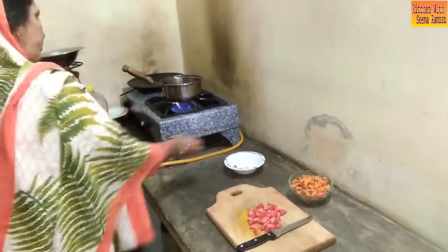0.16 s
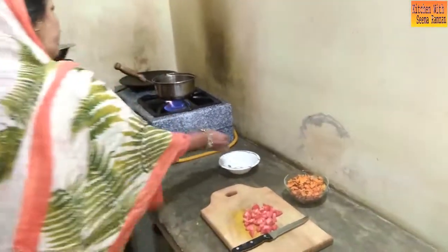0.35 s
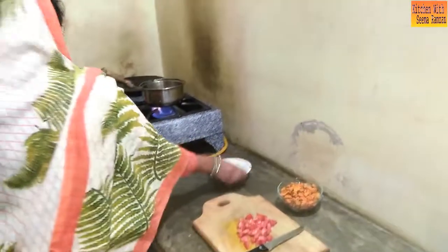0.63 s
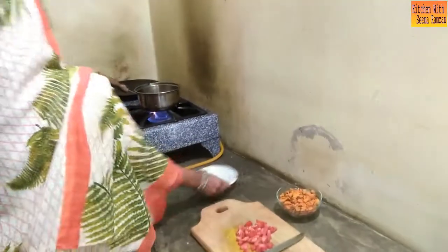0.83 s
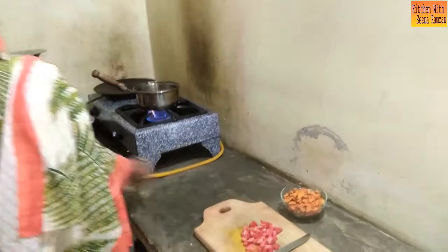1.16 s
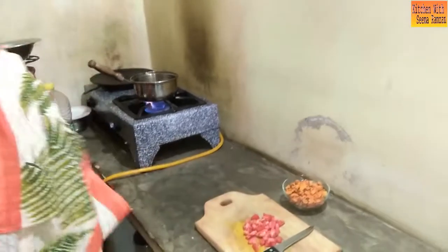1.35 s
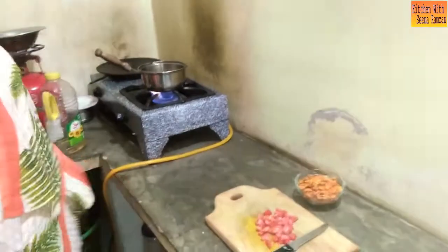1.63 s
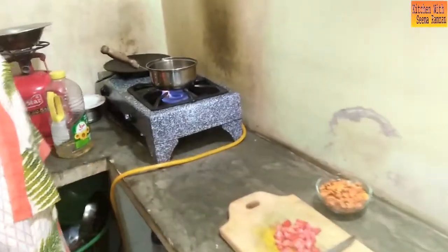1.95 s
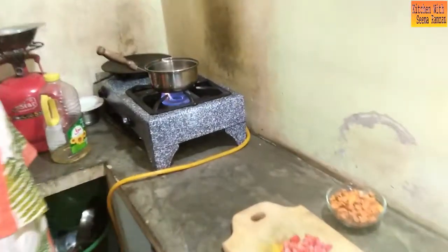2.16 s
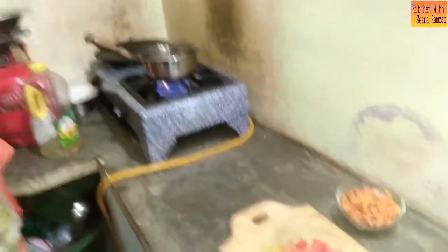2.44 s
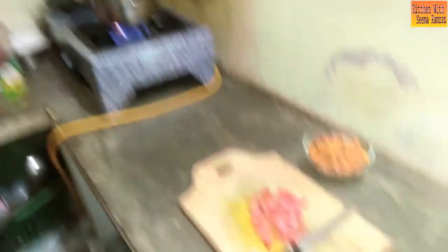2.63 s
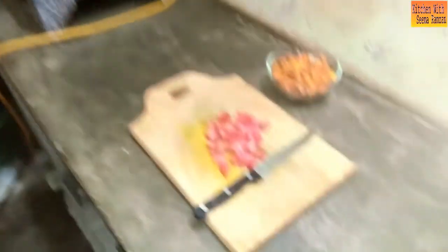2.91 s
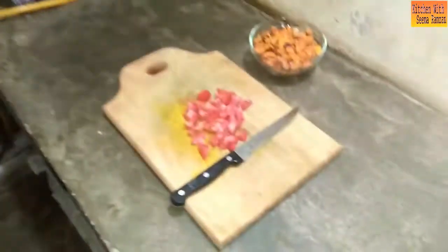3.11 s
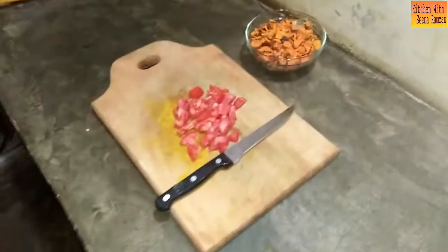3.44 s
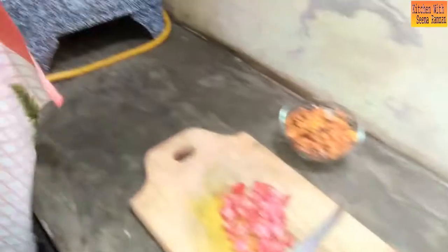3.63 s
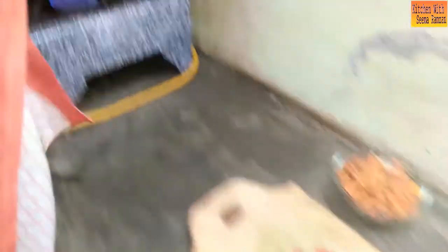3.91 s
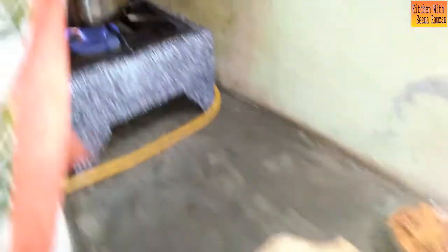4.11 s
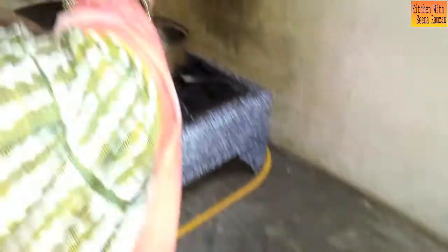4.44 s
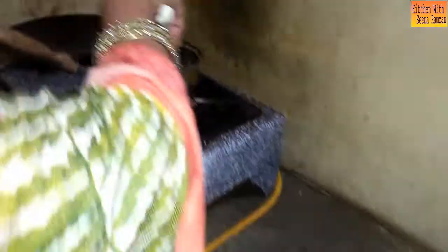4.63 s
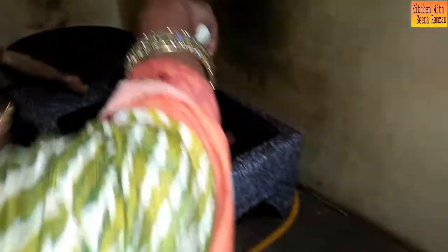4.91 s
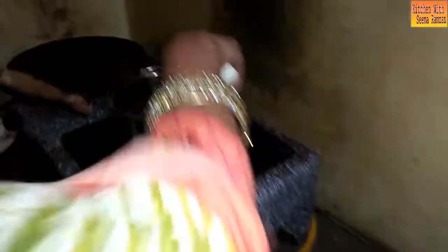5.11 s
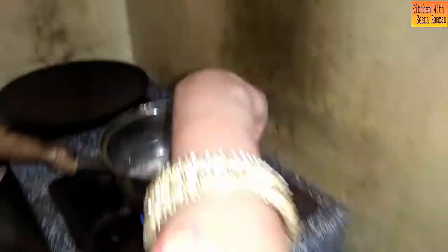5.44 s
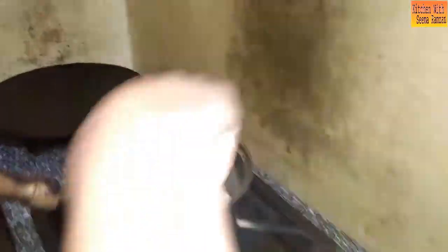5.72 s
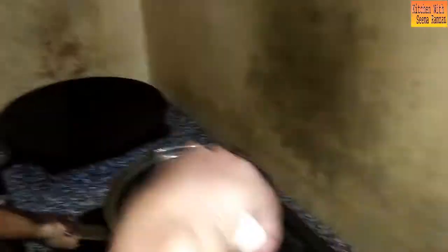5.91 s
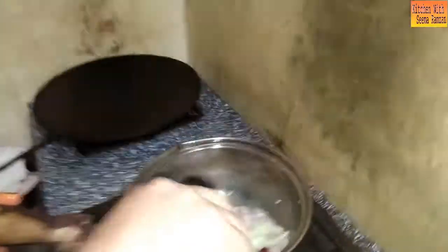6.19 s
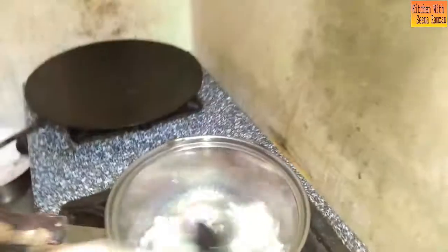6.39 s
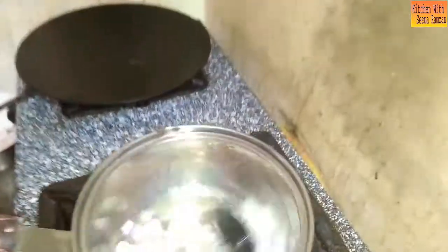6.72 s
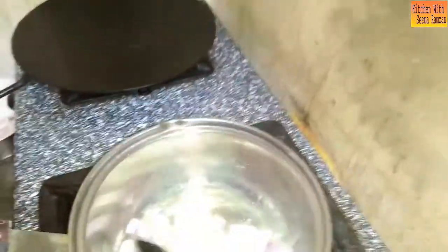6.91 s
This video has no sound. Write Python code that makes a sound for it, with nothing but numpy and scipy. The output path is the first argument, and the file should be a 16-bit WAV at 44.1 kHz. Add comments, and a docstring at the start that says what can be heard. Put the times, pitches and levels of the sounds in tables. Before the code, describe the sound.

A soft, blurred sizzle far off, with hollow bowl knocks and short rubs over stone in a reverberant little kitchen. Then the handheld microphone steps close to the pan: fierce, treble-heavy frying flares up, oil ticks and pops spread left and right, a spoon scrapes through onions and hits steel, and the pan faintly rings above a low rumble.

```python
"""In a small hard-walled kitchen, onions fry in a steel pan on a gas stove: crowds of tiny noise bursts.
At first the pan is far off, and a bowl knocks and slides on the stone counter: rings and slipping noise.
Then the microphone comes close: the sizzle grows loud and bright, and oil spits as sharp coloured ticks.
A spoon stirs and raps the metal; under it lie a pan ring, a low rumble and a faint hum."""
import sys
import numpy as np
from scipy import signal
from scipy.fft import rfft, irfft
from scipy.io import wavfile
from scipy.ndimage import uniform_filter1d

SR = 44100
rng = np.random.default_rng(int(sys.argv[2]) if len(sys.argv) > 2 else 0)


def transcribe(signal):
    """Save signal, clipped to [-1, 1], as a 16-bit WAV file at the path in sys.argv[1]."""
    frames = np.atleast_2d(signal).T
    limited = np.clip(frames, -1, 1)
    pcm = np.round(limited * 32767).astype(np.int16)
    wavfile.write(sys.argv[1], SR, pcm)


N = 311346  # samples, about 7 s
TIME = np.arange(N) / SR
BINS = np.fft.rfftfreq(4096, 1 / SR)  # the pitches in Hz at which spectra are drawn


# Tone of the sizzle and of its finest fizz. Columns: pitch_hz, level_db [dB per Hz, relative]
SIZZLE_TONE = [(900, -27), (2000, -18.5), (3300, -18.5), (4800, -13.5), (5700, -9.5), (7000, -2), (8300, 0),
               (9500, -6), (11000, -26.5), (14300, -36)]
FIZZ_TONE = [(3000, -33), (6000, -14), (9500, -4), (11000, -7.5), (12500, -4), (14000, 0.5), (15000, -16)]
# Loudness of the steady sizzle over time. Columns: time_s, level_db
SIZZLE_LEVEL = [(0, -60), (3.5, -61.5), (3.85, -50.5), (4.45, -42), (5.0, -55), (5.6, -50), (6.0, -43),
                (7.05, -36)]
CRACKLE_DB, POP_DB = 0, 3  # against the sizzle, at nearness 1


def frying(fizz_rise_db=13):
    """Water boils out of the onions and drops crackle; far off, the room blurs the grain into a wash."""
    near = nearness(TIME)
    wash = 1.2 - .7 * near
    sizzle = colour(bubbles(per_s=2000, spread_db=-2.5, wash=wash), read(SIZZLE_TONE, BINS))
    fizz = colour(bubbles(per_s=1100, spread_db=1.5, wash=wash), read(FIZZ_TONE, BINS))
    fizz_gain = gain_of(fizz_rise_db * near - 6)  # the finest fizz carries only from close by
    snaps = near * (gain_of(CRACKLE_DB) * crackles() + gain_of(POP_DB) * pops())
    loudness = np.sqrt(level(SIZZLE_LEVEL) ** 2 + flares())
    return loudness * (sizzle + fizz_gain * fizz + snaps)


# Wet pieces meet the oil and the sizzle flares. Columns: start_s, level_db
FLARES = [(-0.03, -51.5), (0.22, -60), (0.67, -51.5), (0.8, -55.5), (1.08, -52), (1.3, -57), (1.56, -50),
          (1.71, -56), (1.96, -76), (2.49, -56.5), (3.26, -59.5), (3.67, -51), (4.35, -41), (4.73, -43),
          (5.08, -51), (5.87, -38), (6.28, -44), (6.63, -33.5), (6.87, -49)]
FLARE_RISE_S, FLARE_FALL_DB_PER_S = 0.021, 54


def flares():
    """Power of the flares: a quick rise and a steady fall in dB."""
    power = 0
    for start_s, db in FLARES:
        rise = np.clip((TIME - start_s) / FLARE_RISE_S, 0, 1)
        fall_db = FLARE_FALL_DB_PER_S * np.maximum(TIME - start_s - FLARE_RISE_S, 0)
        power = power + (rise * gain_of(db - fall_db)) ** 2
    return power


def bubbles(per_s, spread_db, wash):
    """Tiny bursts of very unequal size, in clumps, over the wash of countless smaller ones."""
    size = gain_of(spread_db * np.minimum(rng.exponential(1, N), 5))
    size *= rng.random(N) < per_s / SR
    bursts = evened(size * rng.standard_normal((2, N)))
    blend = (bursts + wash * rng.standard_normal((2, N))) / np.sqrt(1 + wash ** 2)
    clumps_db = 1.0 * drift(.006) + 1.1 * drift(.03)
    return blend * gain_of(clumps_db)


# Tone of bursting drops, shared by crackles, pops and ticks. Columns: pitch_hz, level_db [relative]
SPIT_TONE = [(100, -42), (700, -17), (1600, -11), (3000, -12.5), (5000, -7.5), (6500, -4), (8300, 1),
             (10500, -6), (12500, -4), (14200, 6)]


def crackles(decay_cycles=11, spread_db=6.0, per_s=330):
    """Larger bubbles snap one by one, each a brief fading tone at one of 48 pitches."""
    count = 48
    size = gain_of(spread_db * np.minimum(rng.exponential(1, N), 4.2))
    size *= rng.random(N) < per_s / SR
    kind, t = rng.integers(0, count, N), TIME[:400]
    out = np.zeros((2, N))
    for k, hz in enumerate(np.geomspace(5600, 14000, count)):
        shape = (1 - np.exp(-hz * t / 3)) * np.exp(-hz * t / decay_cycles)
        tone = np.sin(2 * np.pi * (hz * t + rng.random((2, 1))))
        snap = gain_of(read(SPIT_TONE, hz)) * shape * tone
        for at in np.flatnonzero((kind == k) & (size > 0)):
            add(out, at / SR, size[at] * snap)
    return evened(out)


def pops(per_s=55):
    """Now and then a small drop cracks sharply above the sizzle, as a very short noise burst."""
    out, t = np.zeros((2, N)), TIME[:200]
    for at in np.flatnonzero(rng.random(N) < per_s / SR):
        size_db = 4 * min(rng.exponential(), 2.2)
        add(out, at / SR, gain_of(size_db) * np.exp(-t / .0005) * rng.standard_normal((2, len(t))))
    return colour(out, read(SPIT_TONE, BINS))


# Single sharp ticks of spitting oil, some thin and bright, some fuller.
# Columns: start_s, level_db, body_db [below 5 kHz against the treble]
SPITS = [(1.3052, -29, -17), (3.1401, -36, -16), (4.0664, -23, -0.5), (4.082, -43, -1), (4.2309, -22, -2),
         (4.4617, -21, -2), (4.7208, -12.5, -8), (5.0208, -26, 3.5), (5.3633, -15, -8),
         (5.4891, -19.5, 2.5), (5.6435, -17.5, -20), (5.809, -14.5, -38), (6.0338, -3.5, -4.5),
         (6.0755, -6.5, -4), (6.142, -7.5, -4.5), (6.212, -19, -9), (6.4231, -8.5, -9), (6.477, -15, -10),
         (6.489, -10.5, -1.5), (6.565, -13.5, -1), (6.5993, -12.5, -2), (6.9627, -12, -6), (6.995, -7, -12),
         (7.0217, -15, 11)]
SPIT_ROOM_FAR_DB, SPIT_ROOM_CLOSE_DB = 10.5, -0.5  # room against the direct crack


def spits():
    """Drops burst in the hot oil; the closer the pan, the less room is heard."""
    out = np.zeros((2, N))
    for start_s, db, body_db in SPITS:
        room_db = SPIT_ROOM_FAR_DB + (SPIT_ROOM_CLOSE_DB - SPIT_ROOM_FAR_DB) * approach(start_s)
        add(out, start_s, tick(start_s, db, body_db, room_db))
    return out


# The spoon clinks on the pan. Columns: start_s, level_db, body_db [below 5 kHz against the treble]
CLINKS = [(1.5208, -34.5, 1.5), (1.898, -33.5, -5.5), (3.5318, -22.5, 4), (4.2787, -15, 8),
          (4.6168, -13.5, 0.5), (5.1925, -3, -4.5), (5.3467, -11.5, -0.5), (5.6622, -8, -7.5),
          (6.1511, -3, -2), (6.2238, -10.5, 4.5), (6.6406, -9.5, 13), (6.7512, -9, 0), (6.897, -12, 7.5),
          (6.913, -9.5, 5.5)]
CLINK_ROOM_DB = 5


def clinks():
    """The spoon touches the steel and the room answers."""
    out = np.zeros((2, N))
    for start_s, db, body_db in CLINKS:
        add(out, start_s, tick(start_s, db, body_db, CLINK_ROOM_DB))
    return out


def tick(s, db, body_db, room_db, far_dull_db=9):
    """A sharp tick rings for a few milliseconds, each with its own colour, duller from afar."""
    low = np.interp(BINS, [4500, 7000], [1, 0])
    top = np.interp(BINS, [9500, 12000], [0, 1])
    dull_db = far_dull_db * (.8 - nearness(s))
    tint_db = 2.8 * evened(uniform_filter1d(rng.standard_normal(len(BINS)), size=110))
    spectrum_db = read(SPIT_TONE, BINS) + body_db * low - dull_db * top + tint_db
    return gain_of(db + 12.5) * strike(spectrum_db, room_db, rattle_db=-16, rattle_t60=.02)


# Close spoon raps, each after a dull push. Columns: start_s, rap_peak_db, push_peak_db
RAPS = [(6.1538, -11.5, -23.5), (6.2247, -13, -20), (6.642, -8.5, -14.5), (6.709, -8, -22.5),
        (6.9294, -8.5, -15)]
# Tone of the rap and of the push. Columns: pitch_hz, level_db [relative]
RAP_TONE = [(30, -21), (200, -1), (600, 6.5), (1300, 13.5), (2000, 10), (3000, -7), (6000, -22),
            (14000, -53)]
PUSH_TONE = [(15, -49), (50, 14), (200, 6), (450, 1.5), (900, -1.5), (2000, -23), (6000, -47)]


def raps(lead_s=0.00737):
    """The spoon pushes through the onions, then meets the metal: a dull click, then a harder one."""
    out = np.zeros((2, N))
    rap, push = click(read(RAP_TONE, BINS)), click(read(PUSH_TONE, BINS))
    for start_s, rap_db, push_db in RAPS:
        add(out, start_s - lead_s, gain_of(push_db) * push / abs(push).max())
        add(out, start_s, gain_of(rap_db) * rap / abs(rap).max())
    return out + gain_of(-27) * kitchen(out)


# Tone of the tumbling food and of the low rumble. Columns: pitch_hz, level_db [dB per Hz, relative]
CHURN_TONE = [(100, -6.5), (230, -14), (400, -14.5), (620, -3), (850, 2), (1150, 4.5), (1550, 6),
              (1900, 1.5), (2300, 1.5), (3000, 0), (5000, -10.5), (9000, -0.5)]
RUMBLE_TONE = [(15, 5), (35, -39), (55, -2), (75, 8), (100, 1.5), (160, -13), (280, -6), (500, -14.5),
               (1500, -26)]
# Strokes that push the food around. Columns: start_s, length_s, level_db
STROKES = [(-0.12, 0.3, -54), (0.95, .4, -59), (1.52, 0.45, -61.5), (3.05, 0.46, -57.5), (3.6, 0.84, -48),
           (4.25, 0.69, -45), (5.5, 0.71, -44.5), (6.08, 0.45, -39), (6.86, .18, -33.5)]
# Soft low bumps of someone moving about. Columns: start_s, length_s, level_db
BUMPS = [(0.08, 0.34, -65.5), (1.07, 0.27, -60), (1.92, .2, -56.5), (3.27, 0.28, -62.5),
         (3.68, 0.24, -54.5), (4.22, 0.44, -64), (4.6, 0.17, -51.5), (5.76, 0.32, -50), (6.1, 0.55, -44.5),
         (6.9, 0.17, -38)]
SIMMER_FAR_DB, SIMMER_CLOSE_DB = -64, -51.5  # the pan's own churn between strokes
FLAME_DB = -77.5  # the burner's steady rumble


def stirring(ring_db=9, ring_width_hz=14):
    """Pieces tumble in the pan and its ringing pitches colour them faintly, above a low rumble."""
    modes = sum(gain_of(db / 2) / (1 + ((BINS - hz) / ring_width_hz) ** 2) for hz, db, _ in PAN)
    spectrum_db = read(CHURN_TONE, BINS) + 10 * np.log10(1 + 2 * gain_of(ring_db) ** 2 * modes)
    churn = colour(bubbles(per_s=300, spread_db=-1.0, wash=1.0), spectrum_db)
    rumble = colour(rng.standard_normal((2, N)), read(RUMBLE_TONE, BINS))
    simmer = gain_of(SIMMER_FAR_DB + (SIMMER_CLOSE_DB - SIMMER_FAR_DB) * approach(TIME))
    churn_gain = np.sqrt(simmer ** 2 + swells(STROKES))
    rumble_gain = np.sqrt(gain_of(FLAME_DB) ** 2 + swells(BUMPS))
    return churn_gain * churn + rumble_gain * rumble


# Knocks of bowl and spoon.
# Columns: start_s, level_db, pitch_hz, width_hz, room_db [room against the direct crack]
KNOCKS = [(0.558, -31.5, 1354, 220, 9.5), (.807, -34, 1544, 258, 6), (.819, -34, 1760, 240, 3.5),
          (1.103, -44, 1720, 795, 5.5), (1.901, -39.5, 1230, 700, -4.5), (3.149, -56, 500, 300, -2),
          (3.530, -41, 2410, 1040, 5), (4.28, -43, 1570, 1560, 19), (4.614, -37.5, 1660, 950, 10.5),
          (5.191, -50.5, 1800, 1180, 16), (5.346, -33, 1820, 1160, 1.5), (5.428, -34.5, 1340, 1450, -8),
          (5.685, -27, 1370, 420, -7), (5.785, -25.5, 1150, 525, -2)]
# What a knocked hollow rings with. Columns: multiple [of its pitch], level_db
OVERTONES = [(.42, -24.5), (1, 3), (1.55, -14.5), (1.95, -17.5), (3.4, -23)]


def knocks():
    """Short hollow blows, each a crack through broad resonances, chatter a little and fill the room."""
    out = np.zeros((2, N))
    for start_s, db, hz, width_hz, room_db in KNOCKS:
        rings = [mode_db + hollow(multiple * hz, width_hz) for multiple, mode_db in OVERTONES]
        blow = strike(np.max(rings, axis=0), room_db, rattle_db=-25.0, rattle_t60=0.1)
        add(out, start_s, gain_of(db + 18.5) * blow)
    return out


# Things dragged over stone and steel.
# Columns: start_s, length_s, level_db, pitch_hz [centre], width_hz, squeak_db [against the rub]
SLIDES = [(0.022, 0.04, -57.5, 1790, 1620, -15), (.775, 0.114, -53.5, 835, 470, 3.5),
          (1.972, 0.08, -49.5, 980, 990, 7), (2.175, 0.062, -49.5, 710, 840, -14),
          (2.778, 0.086, -53, 7450, 1400, -16), (2.87, .12, -68, 2470, 500, 7),
          (3.147, 0.064, -60.5, 3370, 1200, 9), (3.285, 0.063, -60.5, 3960, 2240, -8),
          (3.673, 0.055, -50.5, 4540, 3000, -10), (3.959, 0.094, -49, 870, 458, -18),
          (4.364, 0.045, -47.5, 898, 750, -25), (5.46, 0.094, -54.5, 560, 287, -25),
          (5.697, 0.046, -42, 1640, 280, -42), (5.777, 0.19, -50, 680, 690, -25)]
SQUEAK_HZ, SQUEAK_WIDTH_HZ = 2757, 110


def slides(slips_per_s=900):
    """Things dragged over stone and steel: quick slips through one broad resonance and a narrow squeak."""
    out = np.zeros((2, N))
    for start_s, length_s, db, hz, width_hz, squeak_db in SLIDES:
        count = int(length_s * SR)
        slips = rng.standard_normal((2, count)) * (0.27 + (rng.random(count) < slips_per_s / SR))
        spectrum_db = np.maximum(hollow(hz, width_hz), squeak_db + hollow(SQUEAK_HZ, SQUEAK_WIDTH_HZ))
        rub = evened(colour(slips, spectrum_db))
        add(out, start_s, gain_of(db) * rub * signal.windows.tukey(count, .25))
    return out + gain_of(-3) * kitchen(out)


# What the pan rings with. Columns: pitch_hz, level_db, t60_s [time to fall by 60 dB]
PAN = [(265, -11, .9), (299, -10, .5), (460, -22, .4), (600, -16, .4), (788, 0, .8), (904, -12, .7),
       (1470, -12, .4), (1582, -7, .35), (2175, -16, .3), (2370, -17, .3), (4055, -18, .2)]
# The pan is nudged. Columns: start_s, level_db
NUDGES = [(4.372, -38), (4.59, -50), (5.785, -41), (5.93, -51), (6.225, -50), (6.642, -50), (6.929, -57)]


def pan_ring():
    """The pan hums when nudged: fading tones, their pitch wavering as it rocks on its support."""
    out, t = np.zeros((2, N)), TIME[:SR]
    for start_s, db in NUDGES:
        rocked = t + np.cumsum(.008 * drift(.04)[:SR]) / SR
        ring = np.zeros(SR)
        for hz, mode_db, t60 in PAN:
            tone = np.sin(2 * np.pi * (hz * rocked + rng.random()))
            ring += gain_of(mode_db - 60 * t / t60) * tone
        add(out, start_s, gain_of(db) * ring * (1 - np.exp(-t / 0.0057)))
    return out


# A faint hum swells and fades. Columns: start_s, length_s, level_db
HUM = [(2.0, 1.1, -81), (3.58, 0.57, -63)]
HUM_HZ = 434


def hum(waver=0.0047, flutter_db=2.5):
    """A faint, thin tone whose pitch and level waver slightly."""
    turns = np.cumsum(HUM_HZ * (1 + waver * drift(.03))) / SR
    return np.sqrt(2 * swells(HUM)) * gain_of(flutter_db * drift(0.026)) * np.sin(2 * np.pi * turns)


# How long each pitch lingers in the kitchen. Columns: pitch_hz, t60_s [time to fall by 60 dB]
KITCHEN = [(60, 1), (300, 0.37), (1400, 0.57), (4000, 0.49), (8000, 0.43), (14000, 0.1)]


def kitchen(x):
    """Dense reflections from near walls, each band dying at its own speed."""
    count = 24000
    t = np.arange(count) / SR
    taps = rng.choice([-1., 1.], (2, count)) * (rng.random((2, count)) < .25)
    taps *= np.interp(t, [.002, .011, .018, .04], [0.71, 0.6, 1.15, 1.03])
    hz, at, z = signal.stft(taps, SR, nperseg=256)
    fade = gain_of(-60 * at / read(KITCHEN, hz)[:, None])
    tail = signal.istft(z * fade, SR, nperseg=256)[1]
    return signal.fftconvolve(x, tail / np.linalg.norm(tail[0]), axes=1)[:, :N]


def strike(spectrum_db, room_db, rattle_db, rattle_t60):
    """A crack with a brief rattle, then the room's answer, drawn afresh each time."""
    count = 24000
    crack = np.zeros((2, count))
    crack[0, 0] = 1
    crack[1, rng.integers(2, 20)] = .5  # the side part comes slightly later and weaker
    rattle = gain_of(rattle_db - 60 * TIME[:count] / rattle_t60) * rng.standard_normal((2, count))
    room = gain_of(room_db) * kitchen(crack)[:, :count]
    return colour(crack + rattle + room, spectrum_db)


# The listener steps up to the pan; FAR and CLOSE are nearness on a 0-1 scale
STEP_START_S, STEP_END_S, FAR, CLOSE = 3.85, 4.89, 0.03, .72


def approach(s):
    """How much of the step up to the pan is done, 0-1."""
    return np.clip((s - STEP_START_S) / (STEP_END_S - STEP_START_S), 0, 1)


def nearness(s):
    """Nearness of the pan, growing from FAR to CLOSE during the step."""
    return np.clip(FAR + (CLOSE - FAR) * approach(s), 0, 1)


def swells(rows):
    """Power of movements that each swell and fade in one arch."""
    power = 0
    for start_s, length_s, db in rows:
        arch = np.sin(np.pi * np.clip((TIME - start_s) / length_s, 0, 1))
        power = power + (gain_of(db) * arch) ** 2
    return power


def drift(seconds):
    """Smooth random wandering of rms 1 on this time scale."""
    size = int(seconds * SR) + 2
    return evened(uniform_filter1d(uniform_filter1d(rng.standard_normal(N), size), size // 2))


def gain_of(db):
    """Decibels to amplitude."""
    return 10 ** (np.asarray(db) / 20)


def evened(x):
    """Scales to rms 1."""
    return x / np.sqrt(np.mean(x ** 2) + 1e-20)


def read(points, hz):
    """Reads a table of values against pitch, on a log-frequency axis."""
    f, value = np.transpose(points)
    return np.interp(np.log(hz + 1), np.log(f + 1), value)


def level(rows):
    """A dB curve as a gain per sample."""
    return gain_of(np.interp(TIME, *np.transpose(rows)))


def add(mix, s, sound):
    """Mixes a sound in at time s, cut off where the mix ends."""
    part = mix[:, max(round(s * SR), 0):][:, :sound.shape[-1]]
    part += sound[..., :part.shape[1]]


def click(db):
    """The click of energy 1 with this spectrum, its energy as early as possible (minimum phase)."""
    log_gain = np.log(gain_of(np.maximum(np.r_[db, db[-2:0:-1]], -100)))
    taps = np.fft.ifft(np.exp(np.conj(signal.hilbert(log_gain)))).real[:len(db)]
    return taps / np.linalg.norm(taps)


def colour(x, db):
    """Passes both channels through a spectrum."""
    return signal.oaconvolve(x, click(db)[None], axes=1)[:, :x.shape[1]]


def hollow(hz, width_hz):
    """The dB spectrum of a broad, steep-sided resonance."""
    detune = (BINS ** 2 - hz ** 2) / ((BINS + 1) * width_hz)
    return -10 * np.log10(1 + detune ** 2 + (.7 * detune) ** 4 + (detune / 2) ** 6)


# How far each pitch spreads left and right. Columns: pitch_hz, side_gain_db
WIDTH = [(3900, -60), (4250, -9), (5200, -3), (9000, -3.2), (14000, -6)]


def scene():
    """Sources are built as middle and side; only the treble spreads left and right."""
    pan = frying() + spits() + clinks() + raps() + stirring()
    mid, side = pan + knocks() + slides() + pan_ring() + hum()
    side = irfft(rfft(side) * gain_of(read(WIDTH, np.fft.rfftfreq(N, 1 / SR))), N)
    return np.array([mid + side, mid - side])


def record(dry, edge_hz=14330):
    """A steep low-pass filter removes the highest treble."""
    taps = signal.firwin(401, edge_hz, window=("kaiser", 8), fs=SR)
    return signal.oaconvolve(dry, taps[None], "same", axes=1)


dry = scene()
out = record(dry)
transcribe(out)
```